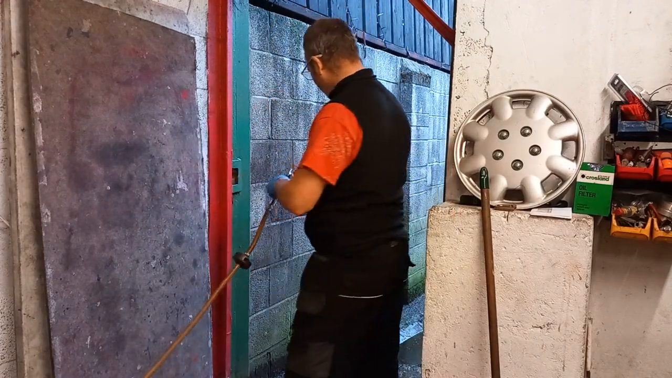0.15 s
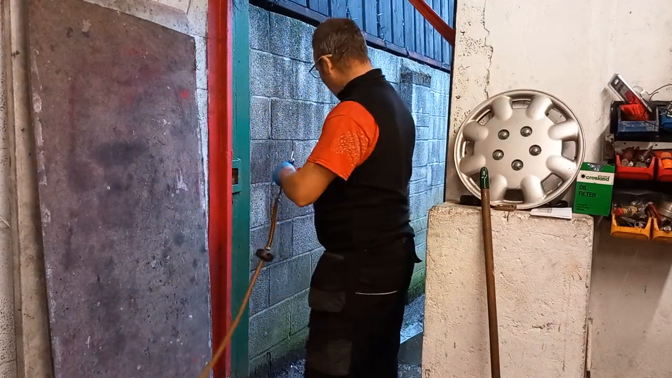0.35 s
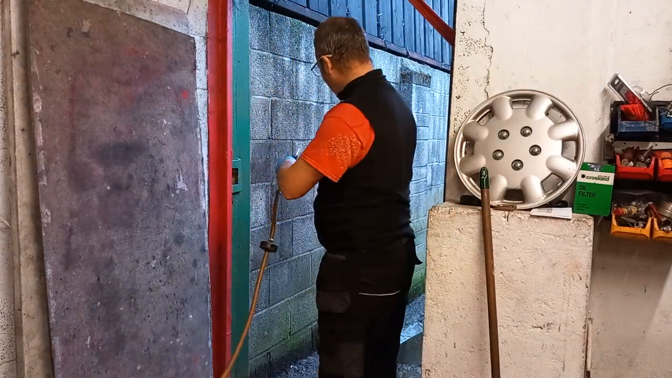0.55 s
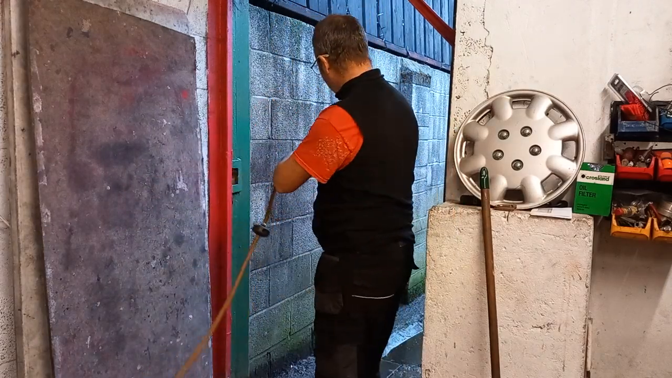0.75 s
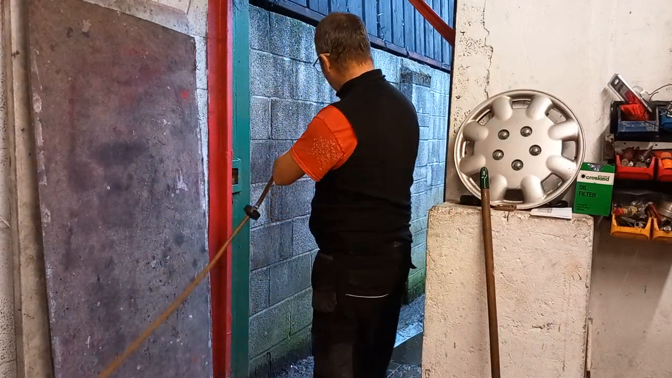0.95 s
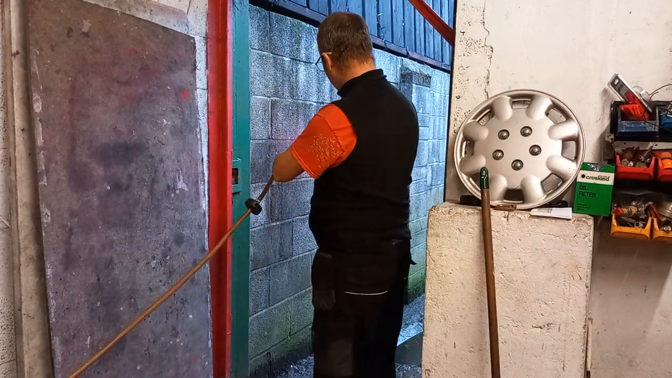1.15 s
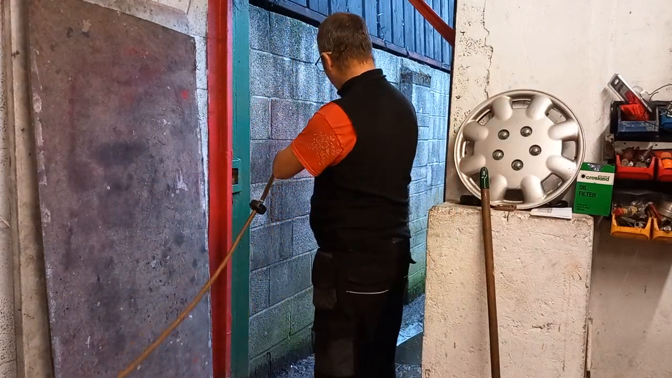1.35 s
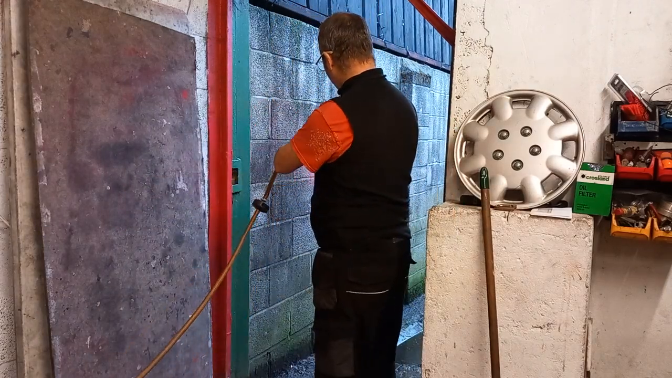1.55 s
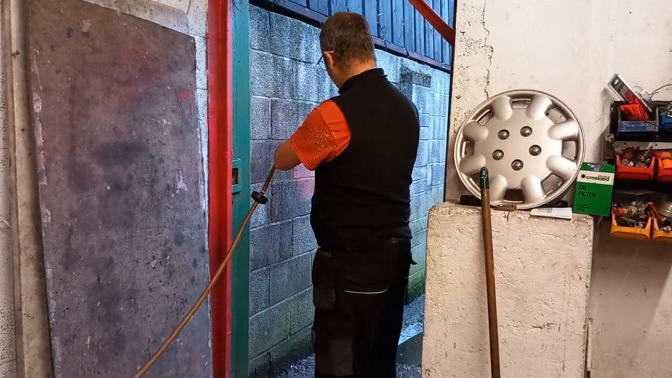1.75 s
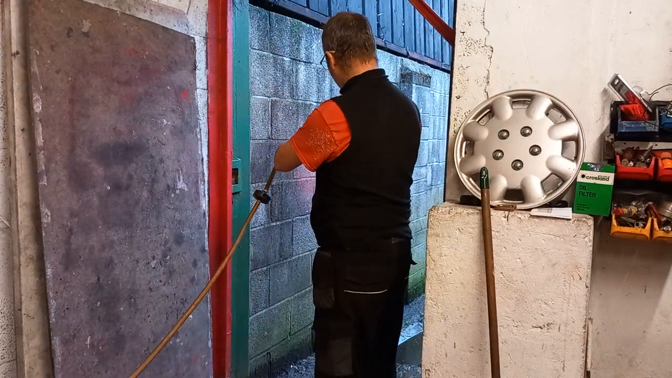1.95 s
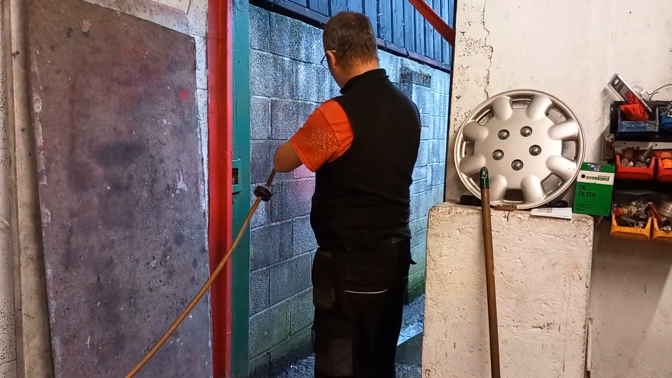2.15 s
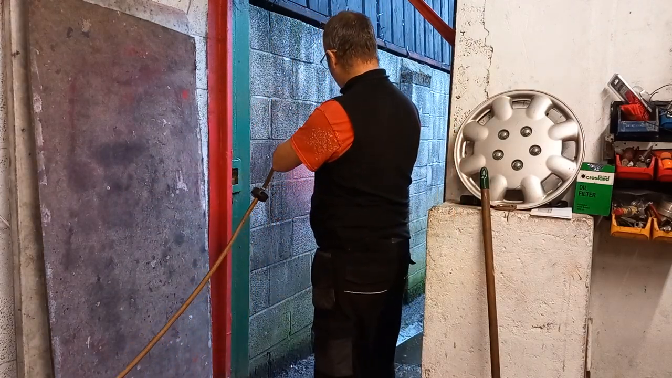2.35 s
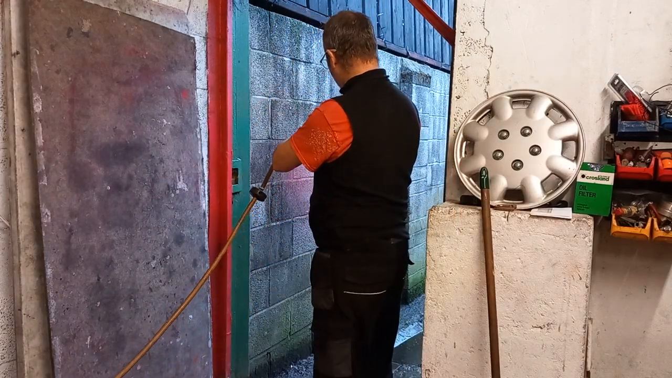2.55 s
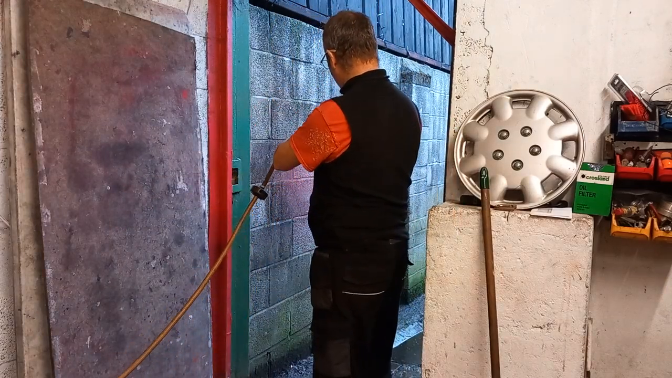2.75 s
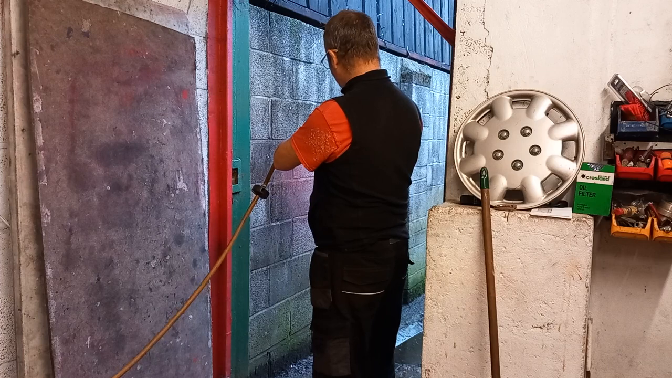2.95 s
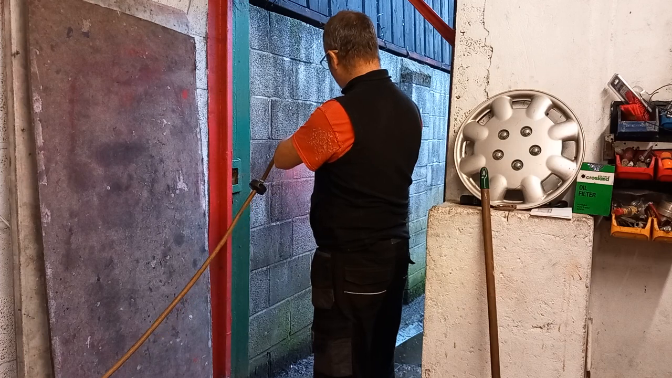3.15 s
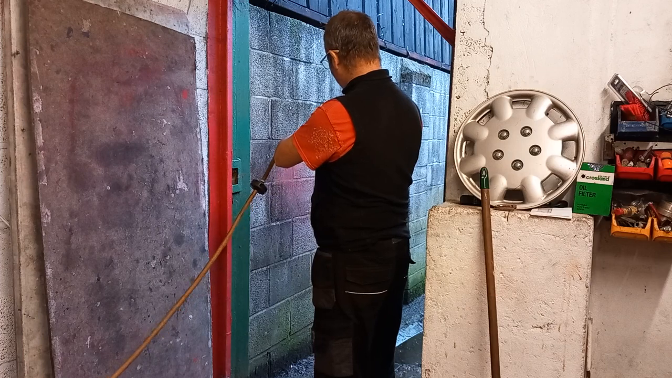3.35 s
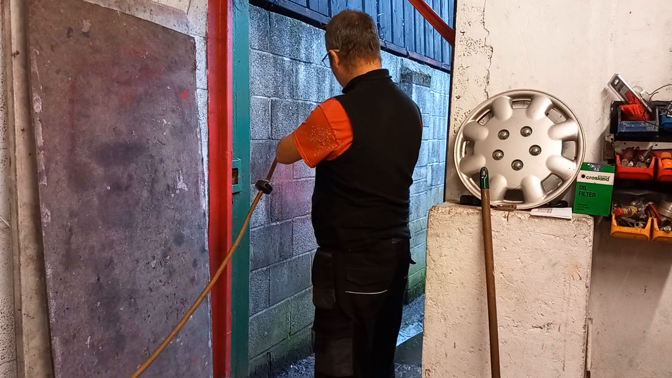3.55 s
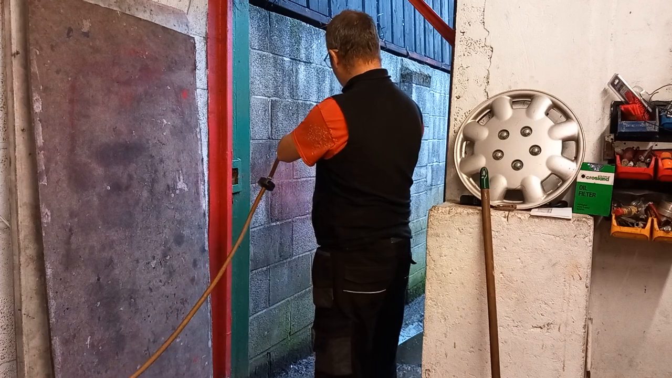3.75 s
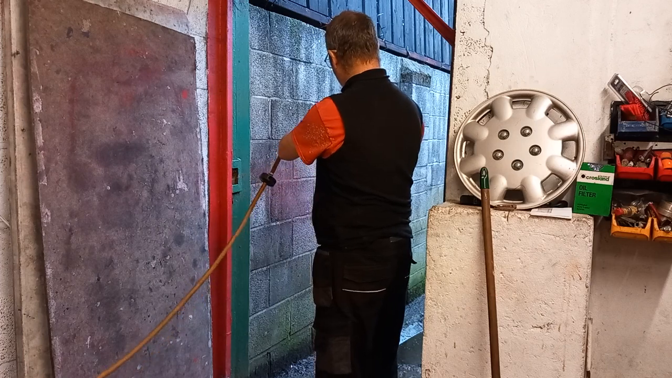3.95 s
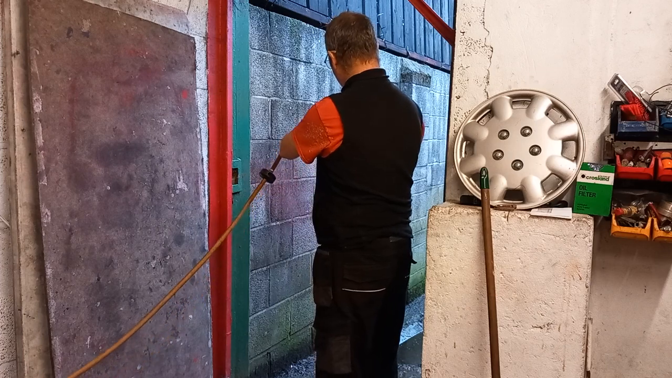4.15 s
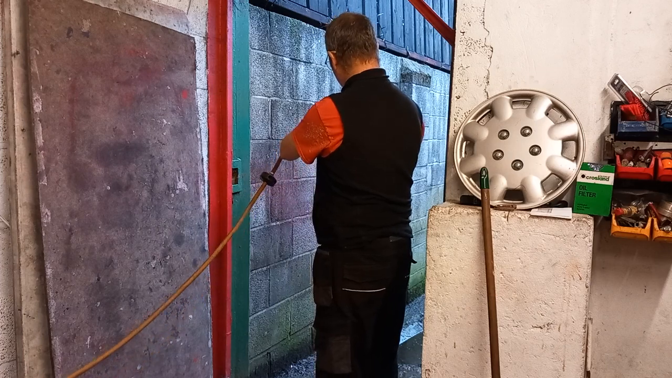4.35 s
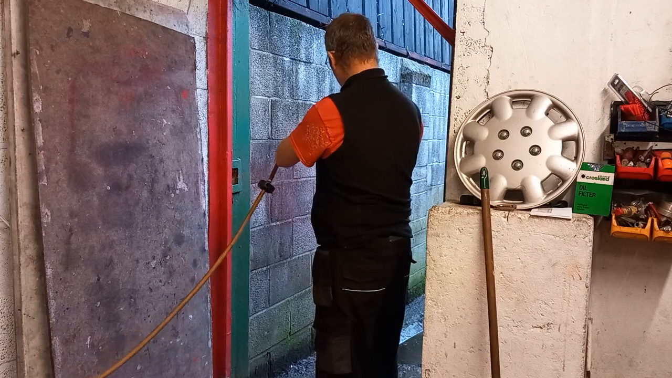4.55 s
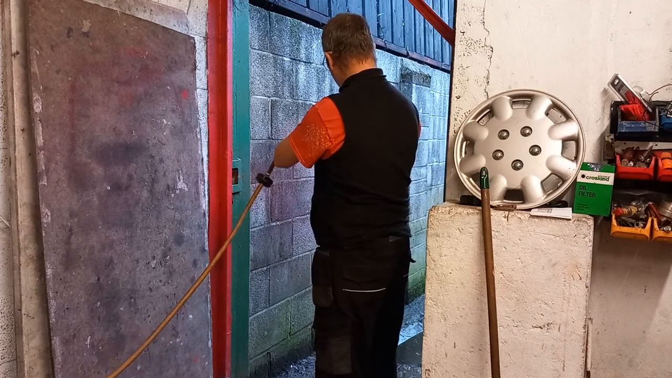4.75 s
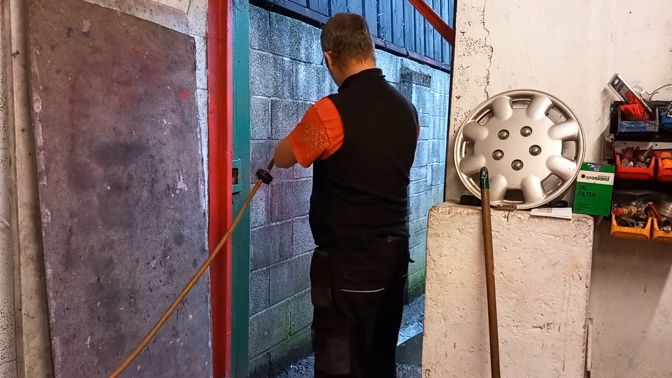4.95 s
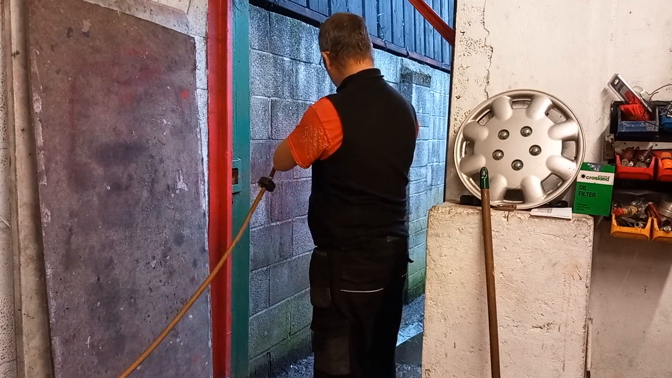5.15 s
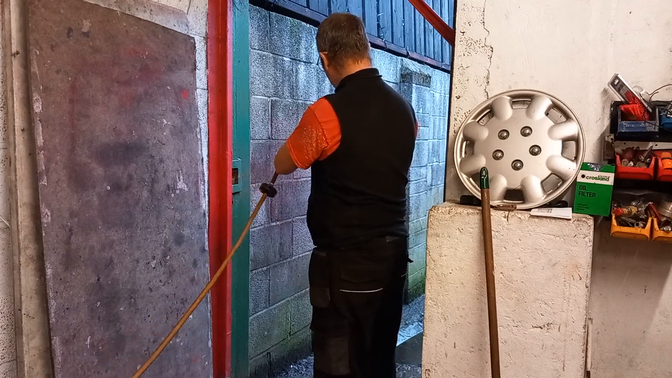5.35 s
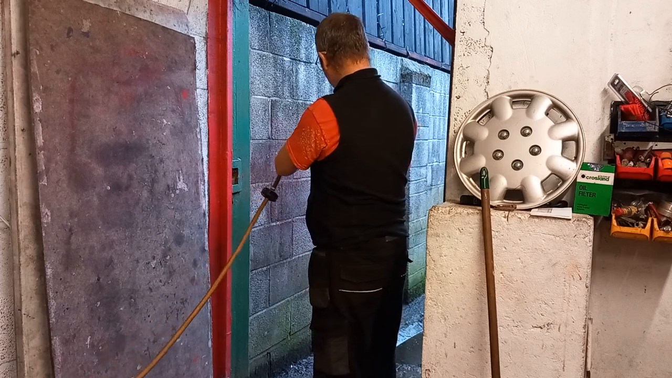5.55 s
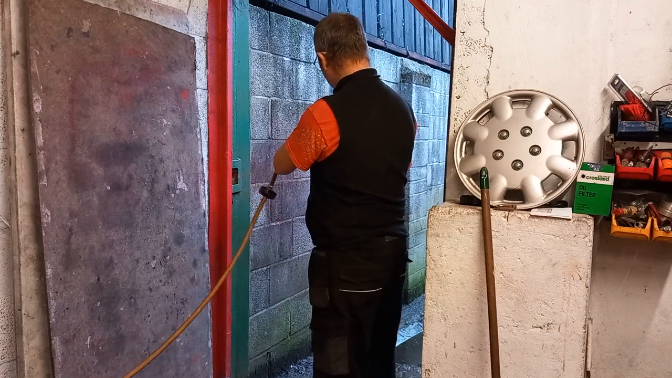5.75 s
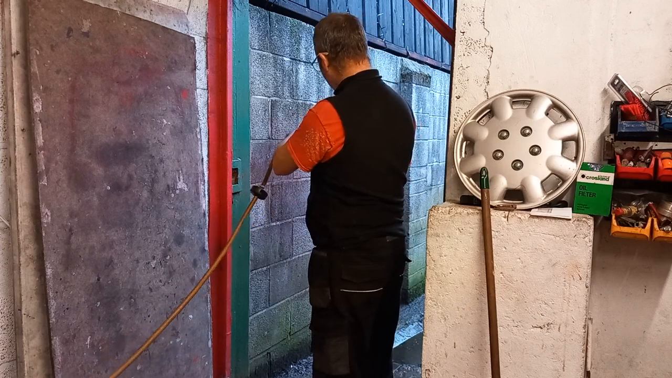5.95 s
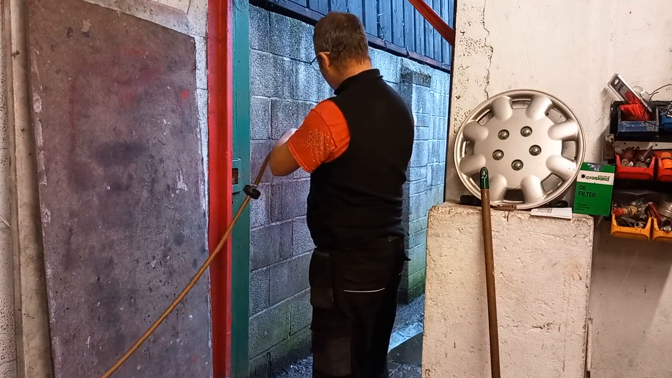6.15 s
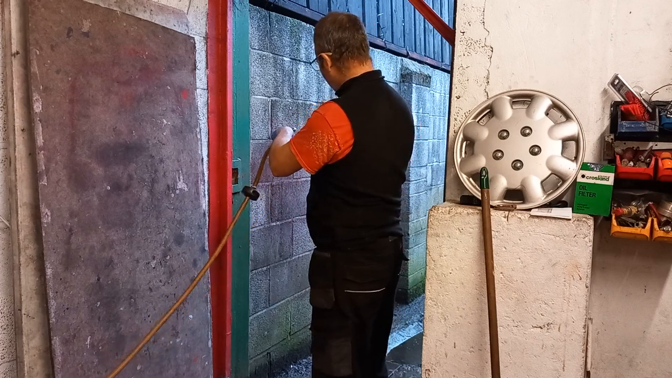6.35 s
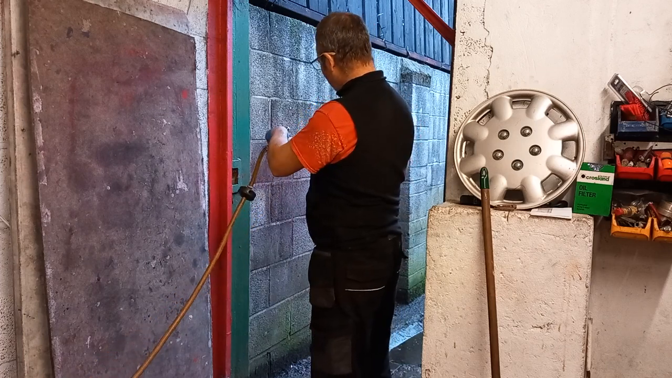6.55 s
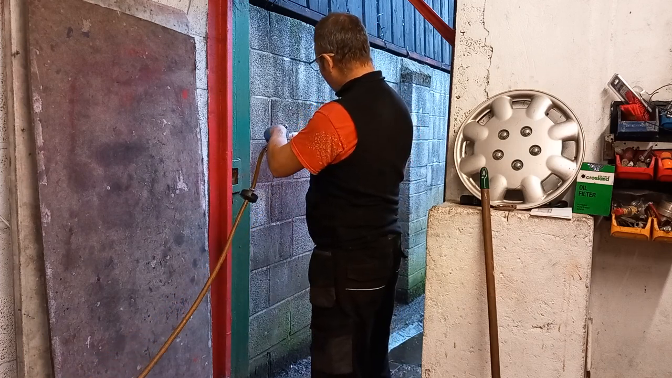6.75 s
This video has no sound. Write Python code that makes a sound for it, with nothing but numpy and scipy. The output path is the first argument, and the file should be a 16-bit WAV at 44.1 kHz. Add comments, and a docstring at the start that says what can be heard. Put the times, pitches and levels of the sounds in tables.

```python
"""In a garage doorway, an air gun blows powder off a coating gun about three metres from the microphone.
After a clack and a few dull steps the valve opens. The air is coloured noise: it hisses, splashes on the
parts and sounds their hollows, which are narrow resonances. Clacks and thuds are short ringing blows.
Block walls throw the blast back as echoes; a compressor, steady low noise, drones further inside."""
import sys
import numpy as np
from scipy import signal
from scipy.fft import rfft, irfft, next_fast_len
from scipy.io import wavfile
from scipy.ndimage import map_coordinates

SR = 44100
rng = np.random.default_rng(int(sys.argv[2]) if len(sys.argv) > 2 else 0)


def pcm_store(signal):
    """Save signal as 16-bit PCM."""
    levels = np.round(np.clip(np.atleast_2d(signal), -1, 1) * 32767)
    wavfile.write(sys.argv[1], SR, levels.astype(np.int16).T)


N = 300321
TIME = np.arange(N) / SR  # seconds
FREQ = np.fft.rfftfreq(N, 1 / SR) + 1e-3  # Hz, kept above zero for the logarithm

OPEN_S = 1.102  # the valve opens (seconds)
EDGE_HZ = 4000  # pitch of the edge tone before each flare shifts it

# Colour of the rush while the barrel shields its middle. Each row: frequency in Hz, relative level in dB.
RUSH_INSIDE = [(1000, -29.5), (2200, -19), (3200, -0.5), (3900, -4), (4600, -2), (5200, -1), (5750, -1.5),
               (6500, 3.5), (7200, 1), (7800, 4), (8200, -2), (8700, -6.5), (10000, -8)]
# Colour of air splashing on the parts. Each row: frequency in Hz, relative level in dB.
SPLASH_COLOUR = [(500, -42), (850, -21), (1050, -8.5), (1250, 3.5), (1500, 5), (1680, 4), (1850, 5.5),
                 (2200, 7), (3200, 3.5), (3900, 1.5), (4700, -4.5), (6000, -7), (10000, -18)]


def air_gun(flutter_db=1.0, eddy_db=0.52):
    """One stream of air drives every part of the blast, and slow and fast eddies shake them together."""
    # Splash: loud when the jet meets the parts squarely, faint when it slips past.
    # Each row: time in seconds, level in dB before each part's own trim.
    splash_level = [(1.13, -22.5), (1.43, -32), (1.56, -30.5), (1.76, -44), (1.87, -32), (2.2, -36.5),
                    (2.65, -32.5), (2.76, -31), (3.09, -30.5), (3.31, -44.5), (3.4, -30.5), (3.46, -39),
                    (3.56, -37.5), (3.68, -42), (3.76, -36.5), (3.83, -43), (3.92, -38), (4.07, -31.5),
                    (4.49, -32), (4.56, -45), (4.66, -39.5), (4.8, -43.5), (4.88, -41), (4.94, -40),
                    (5.12, -41.5), (5.17, -53), (5.22, -37.5), (5.35, -41.5), (5.41, -36.5), (5.47, -51.5),
                    (5.58, -49), (5.6, -38.5), (5.78, -41.5), (5.9, -47), (5.96, -41), (6.29, -45.5),
                    (6.33, -36.5), (6.43, -37.5), (6.52, -48), (6.62, -40), (6.8, -39.5)]
    # The overblown barrel. Each row: time in seconds, level in dB before trim.
    overblown_level = [(1.13, -40), (1.34, -65), (1.68, -41), (1.84, -43), (2.07, -75), (2.62, -41),
                       (2.94, -33.5), (3.26, -35.5), (3.32, -42), (3.39, -31), (3.44, -38), (3.89, -39),
                       (3.94, -28), (4.27, -28), (4.5, -28.5), (4.58, -31.5), (4.66, -57)]
    splash_db = curves(splash_level)[0]
    overblown_db = curves(overblown_level)[0]
    # the jet moves from the barrel to the outside of the gun
    leaves_s, leaving_s = 4.67, 0.2  # gone by, time taken
    aimed = np.clip((leaves_s - TIME) / leaving_s, 0, 1)
    # a hard overblown barrel swallows the jet: roar and wash are halved at this level
    swallow_db = -30
    spilled = 1 / (1 + aimed * undb(overblown_db - swallow_db))

    blast = free_jet(aimed) + splash(splash_db, spilled) + edge_flares() + housing()
    blast = blast + backwash(splash_db, spilled) + door_gusts()
    blast = blast + aimed * barrel() + overblown_barrel(overblown_db)
    open_rise_s = .019
    valve = np.clip((TIME - OPEN_S) / open_rise_s, 0, 1) ** 2
    eddies = undb(flutter_db * walk(30) + eddy_db * walk(400))
    return powder_spits() + valve * eddies * blast


def free_jet(aimed):
    """Fast air tears into noise: its hiss and its rush over edges rise and fall together."""
    # Colour of the hiss. Each row: frequency in Hz, relative level in dB.
    hiss_colour = [(3000, -31), (7000, 0), (9000, -7), (10500, -1.5), (12700, 5), (14500, 2), (15700, 3.5)]
    # Hiss as the nozzle is turned about. Each row: time in seconds, level in dB before trim.
    hiss_level = [(1.13, -20.5), (1.14, -23.5), (1.32, -30), (1.45, -31), (1.55, -30), (1.66, -25),
                  (1.72, -26), (1.79, -23), (1.92, -31.5), (2.57, -30.5), (3.25, -27.5), (3.32, -32.5),
                  (3.39, -26.5), (3.48, -26.5), (3.72, -26.5), (4.07, -30), (4.1, -32.5), (4.46, -30),
                  (4.51, -31.5), (4.63, -32.5), (5.44, -31.5), (5.47, -30.5), (5.58, -31), (5.61, -29),
                  (6.25, -27), (6.39, -31), (6.51, -25), (6.8, -31)]
    # Colour of the rush outside the barrel. Each row: frequency in Hz, relative level in dB.
    rush_colour = [(1000, -34), (2200, -5), (3500, -0.5), (4600, 1.5), (5800, 1.5), (6600, 0), (7200, 2),
                   (7800, 4), (8200, 2), (8700, -7.5), (10000, -11)]
    # The jet swings toward the microphone. Each row: middle in seconds, level in dB, spread in seconds.
    sizzles = [(3.2, -33, 0.084), (3.77, -24, 0.09), (4.51, -25, .035), (5.513, -22.5, 0.061),
               (6.186, -21, .025), (6.27, -20, .022)]
    # Colour of a rasp as the jet skims the outer shell. Each row: frequency in Hz, relative level in dB.
    skim_colour = [(800, -35), (1500, -9), (1950, -0.5), (2450, 1), (3400, -5), (5000, -10), (9000, -35)]
    # Loudness of that rasp. Each row: time in seconds, level in dB.
    skim_level = [(5.58, -70), (5.6, -33.5), (5.76, -30), (5.82, -37), (5.9, -38), (5.97, -34), (6.25, -40),
                  (6.35, -41), (6.52, -47), (6.8, -41)]
    hiss_trim_db, inside_trim_db, outside_trim_db = 4.5, 4, 4.5
    hiss = noise(colour(hiss_colour)) * undb(hiss_trim_db)
    inside = np.sqrt(aimed) * noise(colour(RUSH_INSIDE)) * undb(inside_trim_db)
    outside = np.sqrt(1 - aimed) * noise(colour(rush_colour)) * undb(outside_trim_db)
    jet = (hiss + inside + outside) * undb(curves(hiss_level)[0])
    sizzle = noise(colour(hiss_colour)) * swells(sizzles)
    skim = noise(colour(skim_colour)) * undb(curves(skim_level)[0])
    return jet + sizzle + skim


def splash(splash_db, spilled, buffet_db=1.43):
    """Air striking the parts spreads as noise and makes the housing roar at its resonances."""
    # Resonances of the housing. Each row: pitch in Hz, width in Hz, relative level in dB.
    body = [(675, 180, -10.5), (842, 81, -1.5), (953, 135, -2), (1170, 200, -2.5), (1577, 39, 5)]
    spray_trim_db, roar_trim_db = 5, -4
    spray = noise(colour(SPLASH_COLOUR)) * undb(spray_trim_db)
    roar = noise(resonances(body)) * undb(roar_trim_db)
    return (spray + spilled * roar) * undb(splash_db + buffet_db * walk(45))


def barrel():
    """Air blown into the hollow barrel sounds its first resonances."""
    # First resonances of the barrel. Each row: pitch in Hz, width in Hz, relative level in dB.
    barrel_modes = [(2280, 140, -8), (2455, 40, -1), (2530, 120, -2), (2754, 30, -3), (2800, 90, -7),
                    (3240, 160, -13), (6520, 220, -14), (7450, 220, -14)]
    # The jet aimed into the barrel. Each row: time in seconds, level in dB before trim.
    barrel_level = [(1.13, -15), (1.55, -28.5), (1.65, -20), (1.69, -33), (1.86, -24.5), (2.53, -31),
                    (2.55, -22), (2.92, -27.5), (3.03, -21.5), (3.36, -36.5), (3.38, -28.5), (3.98, -28),
                    (4.13, -23), (4.28, -25), (4.4, -23.5), (4.67, -30)]
    trim_db = -1.57
    return singing(barrel_modes) * undb(curves(barrel_level)[0] + trim_db)


def overblown_barrel(overblown_db):
    """Blown harder, the barrel sings at its overblown resonances and its mouth rushes too."""
    # Overblown resonances. Each row: pitch in Hz, width in Hz, relative level in dB.
    overblown_modes = [(4570, 190, -9), (4860, 75, 0), (5050, 300, -5.5), (6520, 160, -9), (7950, 300, -9),
                       (7903, 22, 0)]
    song_trim_db, mouth_trim_db = 5.5, 5.5
    song = singing(overblown_modes) * undb(song_trim_db)
    mouth = noise(colour(RUSH_INSIDE)) * undb(mouth_trim_db)
    return (song + mouth) * undb(overblown_db)


def edge_flares():
    """The jet catches an edge, flares up as a broad, wavering tone and slides off."""
    # Each row: start in seconds, level in dB, time to fade by 60 dB in seconds, pitch in Hz.
    flares = [(1.585, -27.5, 1.6, 3135), (1.825, -23.5, 0.56, 4640), (2.725, -23, 0.27, 4800),
              (2.855, -20.5, 1.3, 4750), (2.941, -22, .6, 4880), (3.365, -28.5, 1.1, 3470),
              (3.745, -20.5, 0.22, 5290), (3.93, -28, 0.37, 4980), (4.46, -27, .5, 4970),
              (4.56, -21, 0.26, 4900), (5.592, -32, .16, 2150)]
    width_share = 0.11  # resonance width as a share of the pitch
    edge = noise(resonances([(EDGE_HZ, width_share * EDGE_HZ, 0)]))
    total = sum(undb(db) * flare(edge, s, t60, hz) for s, db, t60, hz in flares)
    return bend(total, .014)


def flare(edge, start, t60, hz):
    """The edge tone, played faster or slower to reach its pitch, rises quickly and fades."""
    rise_s = 0.0019
    age = np.maximum(TIME - start, 0)
    clock = age * hz / EDGE_HZ + start / 2  # each flare reads from its own place in the noise
    tone = np.array([np.interp(clock, TIME, port) for port in edge])
    return tone * (1 - np.exp(-age / rise_s)) * burst(start, t60)


def housing():
    """Air crossing the openings of the housing and its shell sounds the air inside, like a bottle."""
    # Lowest resonance of the housing. Each row: pitch in Hz, width in Hz, relative level in dB.
    case_note = [(602, 18, -1.5), (638.4, 21.5, -0.5)]
    # That note, strong only while the jet plays on its opening. Each row: time in seconds, level in dB.
    case_level = [(1.13, -32.5), (1.22, -35), (1.45, -35), (1.56, -46), (1.64, -62), (1.8, -54),
                  (1.88, -46), (2.6, -45.5), (2.8, -45.5), (3.17, -43.5), (3.27, -56), (3.45, -46),
                  (3.75, -55.5), (4.15, -51), (4.6, -58), (5.05, -48.5), (5.3, -53), (5.55, -60),
                  (5.67, -50), (5.85, -53), (6.8, -53.5)]
    # Two hollows of the outer shell. Each row: pitch in Hz, width in Hz, relative level in dB.
    hollows = [(915, 130, 0), (1560, 110, 0)]
    # The jet lingers on those hollows. Each row: time in seconds, level in dB.
    hollows_level = [(1.8, -60), (1.88, -36.5), (2.1, -37), (2.2, -34.5), (2.35, -34.5), (2.5, -37),
                     (2.62, -52), (2.73, -37), (3.1, -42), (3.3, -65)]
    # Breathy puffs at an opening. Each row: middle in seconds, level in dB, spread in seconds.
    puffs = [(4.384, -45, 0.04), (4.88, -45, .018), (5.105, -47, 0.03), (5.21, -41, .018),
             (5.39, -43, 0.04)]
    # Resonances of the puffs. Each row: pitch in Hz, width in Hz, relative level in dB.
    puff_modes = [(400, 120, -8), (625, 55, 0), (700, 260, -5)]
    note = bend(noise(resonances(case_note)), .007) * undb(curves(case_level)[0])
    shell = bend(noise(resonances(hollows)), .028) * undb(curves(hollows_level)[0])
    return note + shell + noise(resonances(puff_modes)) * swells(puffs)


def backwash(splash_db, spilled):
    """Spent air washes back as low noise: more with a harder splash, and extra while the hose empties."""
    # Colour of the wash. Each row: frequency in Hz, relative level in dB.
    wash_colour = [(25, -42), (55, -26), (95, -33), (135, -7), (200, -5), (240, -5), (320, 7), (380, 3.5),
                   (460, 2), (600, -2.5), (900, 3.5), (2000, -26)]
    base_db, usual_splash_db = -46.5, -35  # wash level under the usual splash, before surge and sag
    follows = 0.59  # dB gained per dB of splash
    surge_db, surge_s = 2, 0.21  # air stored in the hose leaves first: extra wash and its time constant
    sag_db_per_s = 1.5
    age = np.maximum(TIME - OPEN_S, 0)
    surge = surge_db * np.exp(-age / surge_s)
    wash_db = base_db + follows * (splash_db - usual_splash_db) + surge - sag_db_per_s * age
    return spilled * noise(colour(wash_colour)) * undb(wash_db)


def door_gusts():
    """Gusts of spent air buffet the door, heard as swells of noise at its low resonances."""
    # Each row: middle in seconds, level in dB, spread in seconds.
    gusts = [(1.16, -42, .009), (1.263, -48, .096), (1.483, -62, .099), (4.45, -55, .04)]
    # Resonances of the door. Each row: pitch in Hz, width in Hz, relative level in dB.
    door = [(86, 30, -11), (136, 28, 2), (234, 70, -1)]
    return noise(resonances(door)) * swells(gusts)


def powder_spits():
    """Plugs of powder spit out as sudden bursts of splash noise."""
    # Each row: start in seconds, level in dB.
    spits = [(1.116, -16.5), (1.124, -18), (1.342, -22)]
    spit_s = 0.053  # time to fall by 60 dB
    return noise(colour(SPLASH_COLOUR)) * sum(undb(db) * burst(s, spit_s) for s, db in spits)


def handling():
    """The gun clacks and rattles, feet and hose thud, soles scuff the concrete."""
    # Hard clacks. Each row: start in seconds, tick peak in dB, rattle in dB, rattle's ring time in seconds.
    clacks = [(0.255, -23.5, -36, .04), (.268, -41, -35.5, .075)]
    # Colour of tick and rattle. Each row: frequency in Hz, relative level in dB.
    clack_colour = [(60, -24), (150, 4), (225, 1), (330, 3), (560, 2), (1100, 5), (1550, 5), (2200, -3),
                    (3200, -27), (8000, -30), (15000, -51)]
    # Dull steps and hose bumps. Each row: start in seconds, level in dB, ring time in seconds, pitch in Hz.
    steps = [(.263, -41, .09, 225), (.371, -41, .06, 260), (.384, -46, .07, 215), (.407, -42, .04, 410),
             (.434, -42, .08, 209), (.484, -39, .04, 312), (.491, -44, .07, 135), (.958, -35, .045, 360),
             (.975, -50, .12, 255), (1.0, -52, .2, 145)]
    # Scuffs of the soles. Each row: middle in seconds, level in dB, spread in seconds.
    scuffs = [(0.405, -48.5, 0.05), (0.755, -61, 0.027), (1, -55, 0.062)]
    # Colour of the gritty scuff. Each row: frequency in Hz, relative level in dB.
    scuff_colour = [(100, -3), (300, 6), (700, -3), (1500, -3), (3000, -10), (7500, -14), (9000, -26),
                    (15000, -27)]
    grit_db = -14  # grit in each bump, relative to the bump's level
    rattle = noise(colour(clack_colour))
    grit = noise(colour(scuff_colour))
    blow = tick(colour(clack_colour))
    total = grit * swells(scuffs)
    for s, tick_db, rattle_db, t60 in clacks:
        total = total + undb(tick_db) * np.interp(TIME - s, TIME, blow, left=0)
        total = total + undb(rattle_db) * rattle * burst(s, t60)
    for s, db, t60, hz in steps:
        gritty = grit * undb(grit_db) * burst(s, t60)
        total = total + undb(db) * (thud(s, t60, hz) + gritty)
    return total


def thud(start, t60, hz):
    """A soft blow builds up gently and rings a few low modes; the higher ones die sooner."""
    # Each row: multiple of the bump's pitch, relative level in dB.
    thud_modes = [(1, 0), (1.56, -13), (2.45, -15)]
    rise_s = .004
    age = np.maximum(TIME - start, 0)
    ring = sum(undb(db) * np.sin(2 * np.pi * hz * k * age) * burst(start, t60 / k) for k, db in thud_modes)
    return ring * (1 - np.exp(-(age / rise_s) ** 2))


def tick(gain):
    """One sharp blow of the given colour: its energy comes as early as possible, peak 1."""
    cepstrum = irfft(np.log(gain), N)
    # keeping only the early half of the cepstrum makes the blow start at once
    ring = irfft(np.exp(rfft(2 * cepstrum * (np.arange(N) < N // 2))), N)
    return ring / np.abs(ring).max()


def compressor():
    """A distant machine makes a nearly steady rushing drone, and the room adds a low boom."""
    # Colour of the drone. Each row: frequency in Hz, relative level in dB.
    drone_colour = [(18, -67), (30, -57), (67, -18), (90, -25), (144, -15), (168, -12), (575, 3.5),
                    (691, 0), (1170, 1), (1260, -0.5), (3230, -2), (3780, -4.5), (7860, -11.5),
                    (8950, -22.5), (15500, -25)]
    # Loudness of the drone. Each row: time in seconds, level in dB before the throb.
    drone_level = [(0, -49.5), (.2, -49), (.45, -48), (.65, -50.5), (.9, -50.5), (1.1, -50)]
    # Booming resonances of the room. Each row: pitch in Hz, width in Hz, relative level in dB.
    boom_modes = [(72, 14, 0.5), (134, 26, 11)]
    throb_db, boom_db = .4, -76
    drone = noise(colour(drone_colour)) * undb(curves(drone_level)[0] + throb_db * walk(9.4))
    return drone + noise(resonances(boom_modes)) * undb(boom_db)


def garage(x, tail_db=-3.0, t60=0.27):
    """A few early echoes comb the sound; a short diffuse tail follows."""
    # Echoes off door and walls. Each row: delay in seconds, left gain, right gain (plain factors).
    echoes = [(.0040, .08, .08), (0.0088, .1, .1), (0.0205, .14, .14)]
    paths = undb(tail_db) * diffuse(t60)
    paths[:, 0] += 1  # the direct sound
    for s, *gains in echoes:
        paths[:, int(s * SR)] += gains
    return signal.fftconvolve(x, paths, axes=1)[:, :N]


def diffuse(t60):
    """Late reflections are decaying noise for each port; their bass is more alike in both."""
    size = SR // 2
    hz = np.fft.rfftfreq(size, 1 / SR)
    decay = burst(0.0053, t60)[:size]
    mid, side = rfft(rng.standard_normal((2, size)) * decay / np.linalg.norm(decay))
    alike = .6 / (1 + (hz / 900) ** 4)
    common = np.sqrt((1 + alike) / 2) * mid
    opposed = np.sqrt((1 - alike) / 2) * side * np.array([[1], [-1]])
    return irfft(common + opposed, size)


def singing(modes, waver_db=1.9):
    """A blown hollow: two interleaved sets of resonances bend and waver apart, so the lead keeps changing."""
    first, second = resonances(modes[::2]), resonances(modes[1::2])
    total = np.sqrt(np.sum(first ** 2 + second ** 2))
    song = 0
    for gain, bend_share in ((first, .014), (second, .0035)):
        voice = bend(noise(gain), bend_share) * np.linalg.norm(gain) / total
        song = song + voice * undb(waver_db * walk(35))
    return song


def bend(x, share):
    """The jet's angle bends a resonance: the pitch wanders by about the given share."""
    clock = TIME + np.cumsum(share * walk(9)) / SR
    return np.array([np.interp(clock, TIME, port) for port in x])


def noise(gain, bass_alike=0.41, wide_hz=850, lag_s=.00011):
    """Turbulence of the given colour at both ports, rms 1: bass more alike, treble partly scattered."""
    direct_share = .45  # share of the treble's power that comes on a straight path
    size = next_fast_len(N, True)
    hz = np.fft.rfftfreq(size, 1 / SR)
    shared = np.clip(direct_share + bass_alike / (1 + (hz / wide_hz) ** 4), 0, 1)
    spectra = rng.standard_normal((3, 2 * len(hz))).view(complex)
    # the left port hears the straight path first
    direct = np.array([spectra[0], spectra[0] * np.exp(-2j * np.pi * hz * lag_s)])
    mixed = np.sqrt(shared) * direct + np.sqrt(1 - shared) * spectra[1:]
    x = irfft(mixed * np.interp(hz, FREQ, gain), size)[:, :N]
    return x / x.std()


def colour(points):
    """Gain per frequency from rows of Hz and dB, joined on a logarithmic pitch scale."""
    hz, db = np.transpose(points)
    return undb(np.interp(np.log(FREQ), np.log(hz), db))


def resonances(modes):
    """Gain per frequency of steep-sided resonances, each halved one width away from its pitch."""
    power = sum((undb(db) / (1 + ((FREQ - hz) / width) ** 2)) ** 2 for hz, width, db in modes)
    return np.sqrt(power)


def curves(table):
    """Each column of a timed table, joined by straight lines."""
    s, *columns = np.transpose(table)
    return [np.interp(TIME, s, c) for c in columns]


def walk(rate):
    """Smooth chance with about rate turns a second and a spread of about 1."""
    knots = rng.standard_normal(8192)
    return map_coordinates(knots, [TIME * rate], order=2, mode="wrap")


def burst(start, t60):
    """A sudden start and an exponential decay that falls 60 dB in t60 seconds."""
    age = TIME - start
    return (age >= 0) * np.exp(-np.log(1000) * np.maximum(age, 0) / t60)


def swells(table):
    """Soft bell-shaped rises and falls, each around its own moment."""
    return sum(undb(db) * np.exp(-((TIME - s) / spread) ** 2 / 2) for s, db, spread in table)


def undb(db):
    """Decibels to gain."""
    return 10 ** (np.asarray(db) / 20)


def scene():
    """All sources share the one room."""
    return garage(air_gun() + handling() + compressor())


def record(dry, low_cut_hz=72):
    """Two ports colour the sound a little differently; rumble and top are cut, the tallest peaks rounded."""
    # Left port minus right port. Each row: frequency in Hz, difference in dB.
    ports = [(200, 0), (700, 0.5), (1300, 2.5), (2400, 2.5), (4400, -1), (8100, 1.5), (15000, -1.5)]
    top_hz = 15750
    lean = np.sqrt(colour(ports))  # half the difference goes to each port
    ported = irfft(rfft(dry) * np.array([lean, 1 / lean]), N)
    thinned = signal.sosfilt(signal.butter(3, low_cut_hz, "high", fs=SR, output="sos"), ported)
    rounded = thinned / (1 + (thinned / .85) ** 4) ** .25
    return signal.sosfilt(signal.ellip(12, .1, 80, top_hz, fs=SR, output="sos"), rounded)


dry = scene()
out = record(dry)
pcm_store(out)
```